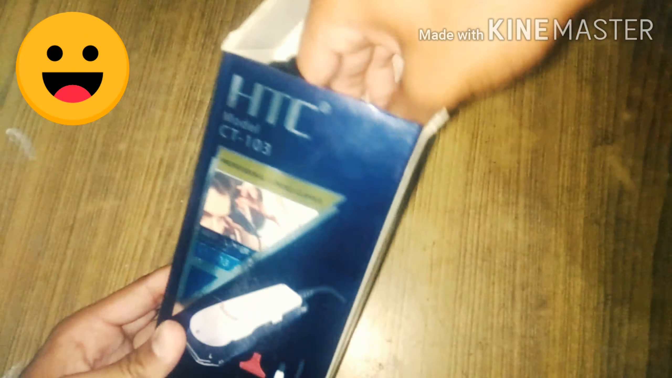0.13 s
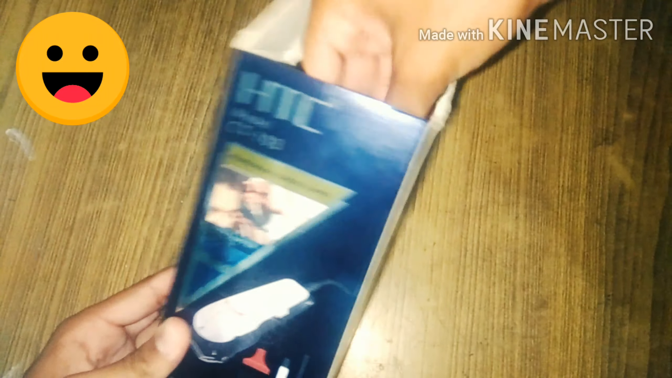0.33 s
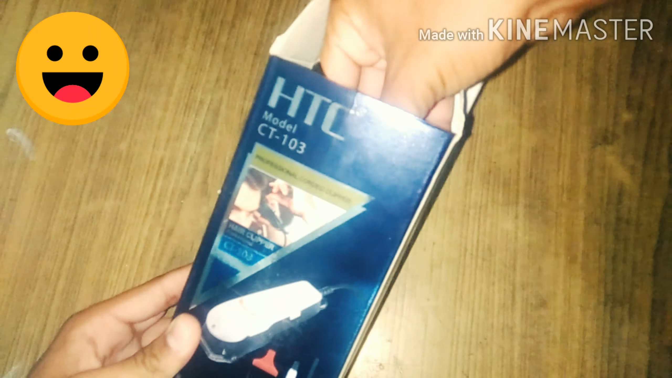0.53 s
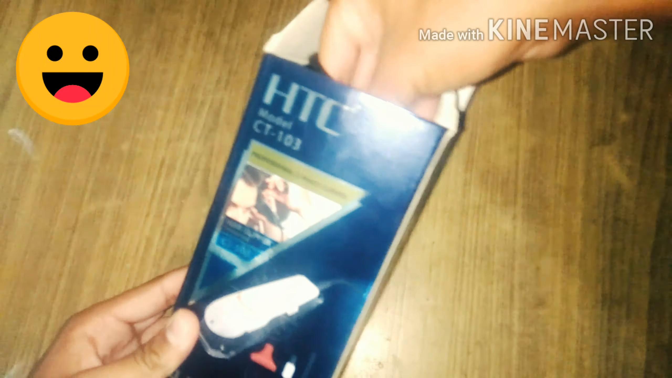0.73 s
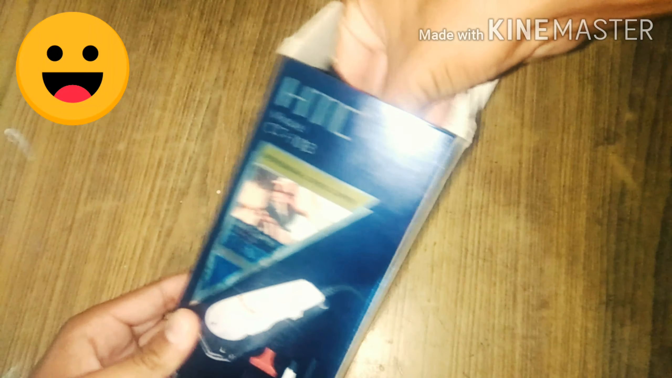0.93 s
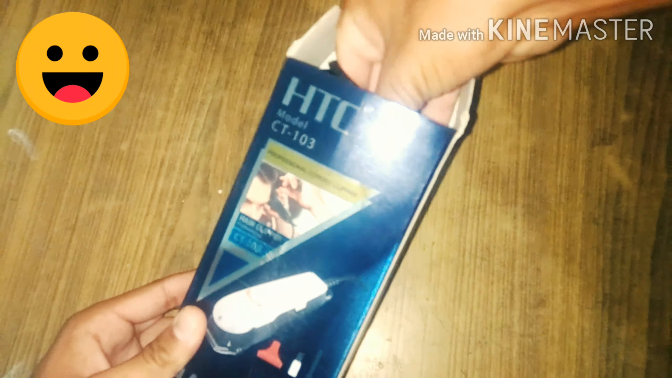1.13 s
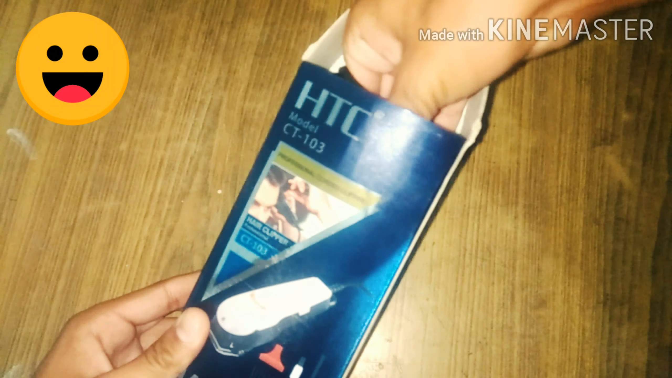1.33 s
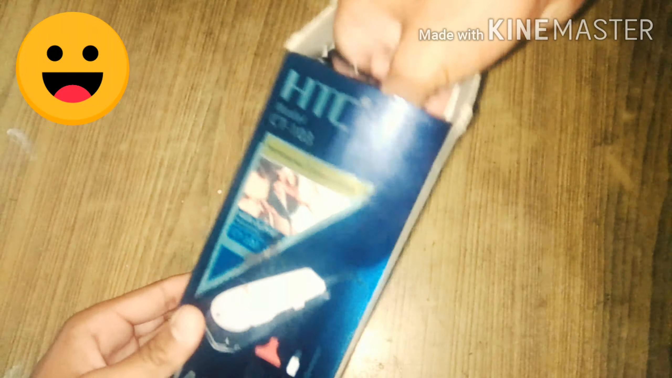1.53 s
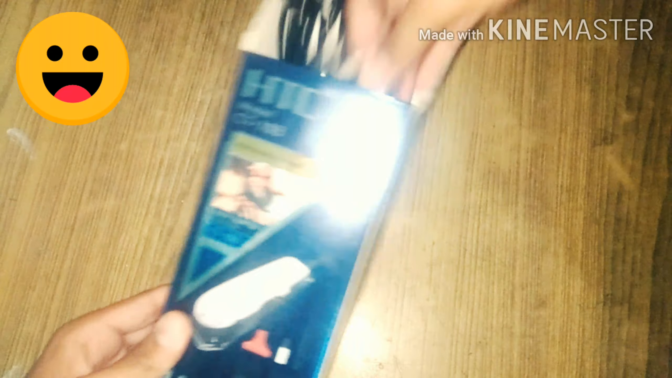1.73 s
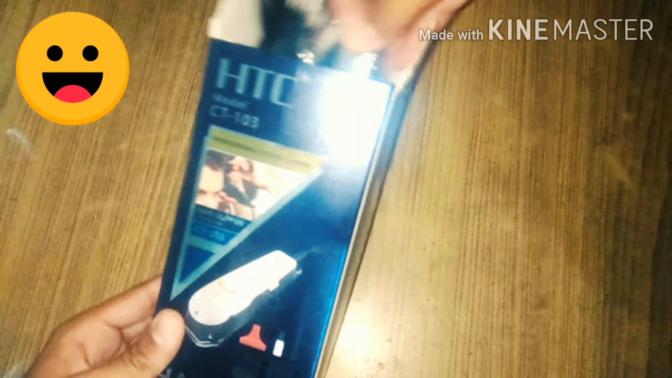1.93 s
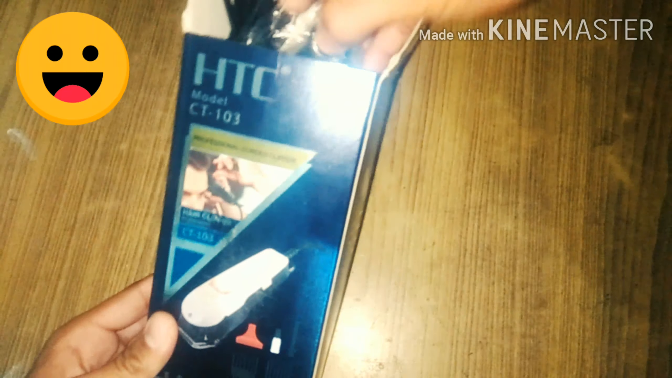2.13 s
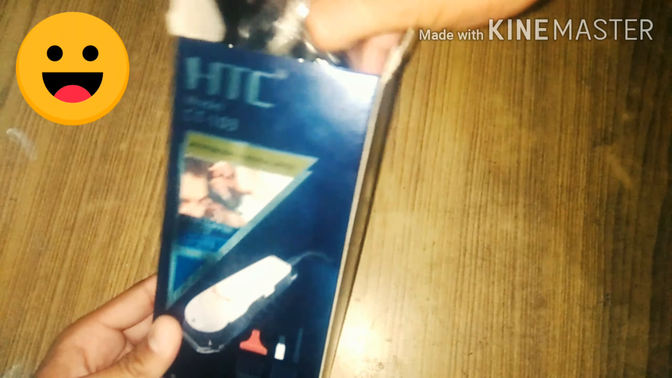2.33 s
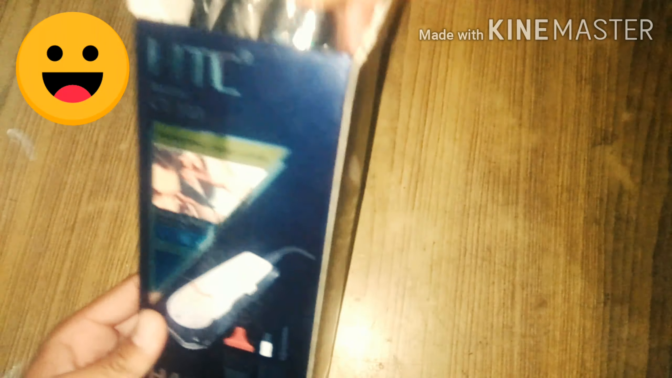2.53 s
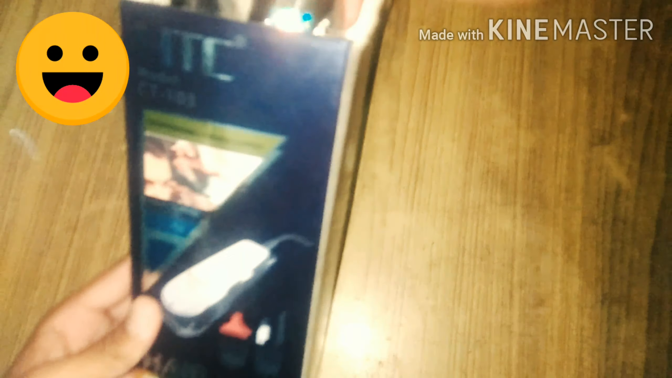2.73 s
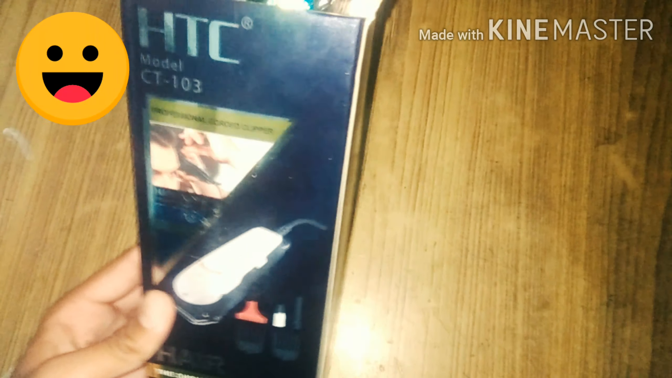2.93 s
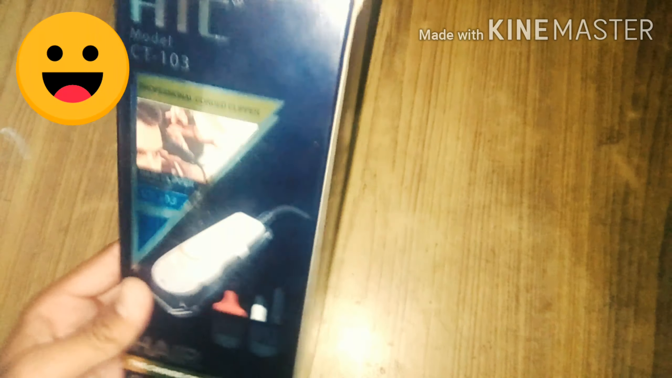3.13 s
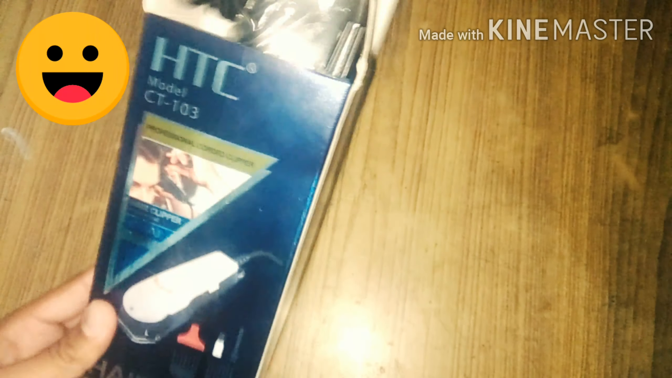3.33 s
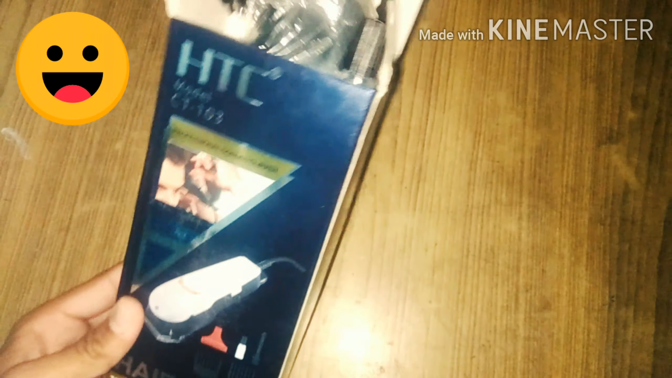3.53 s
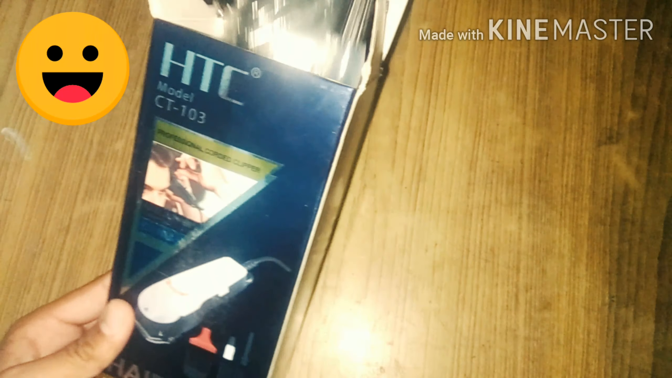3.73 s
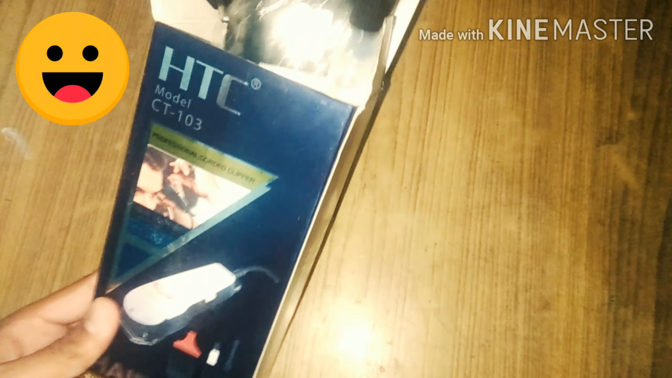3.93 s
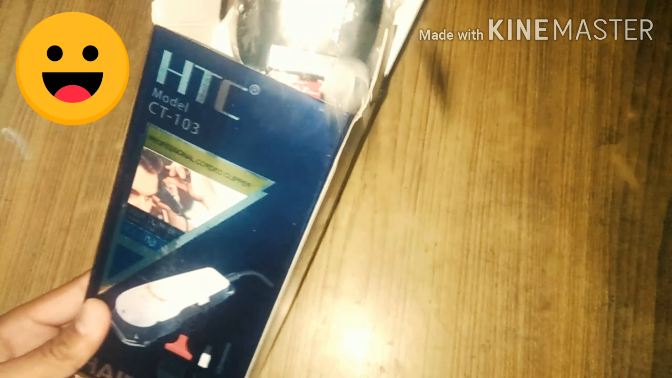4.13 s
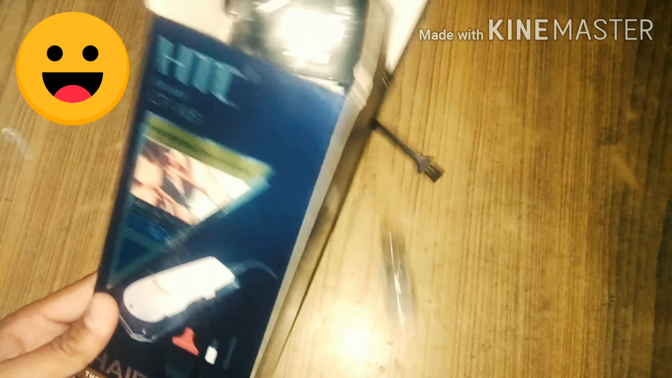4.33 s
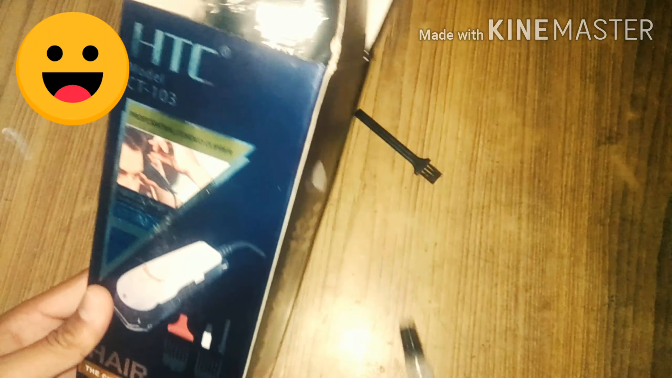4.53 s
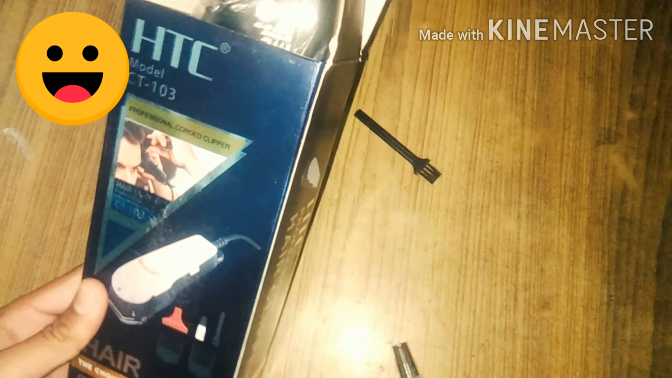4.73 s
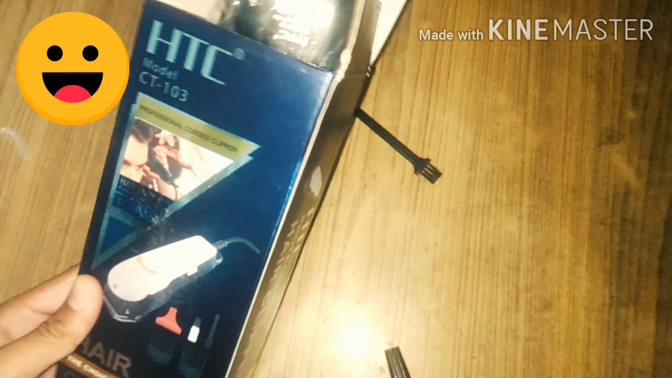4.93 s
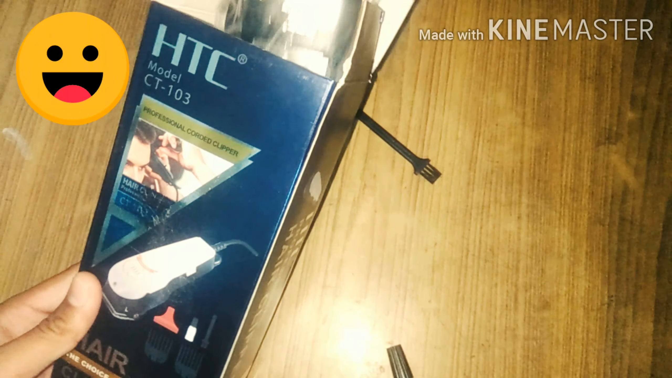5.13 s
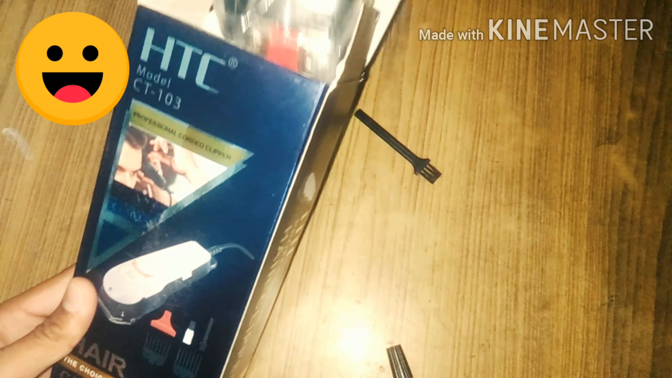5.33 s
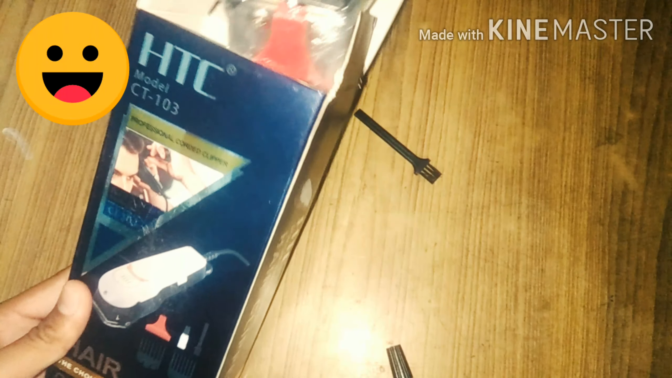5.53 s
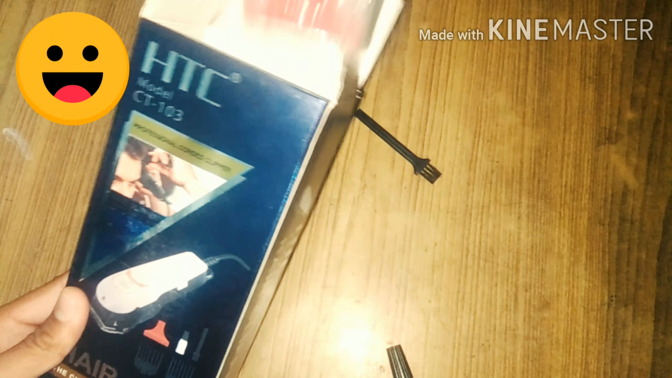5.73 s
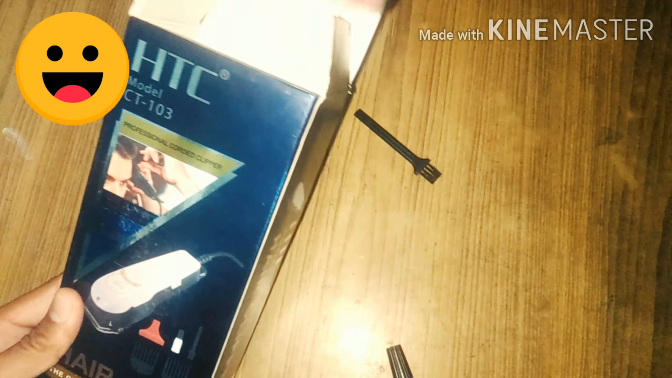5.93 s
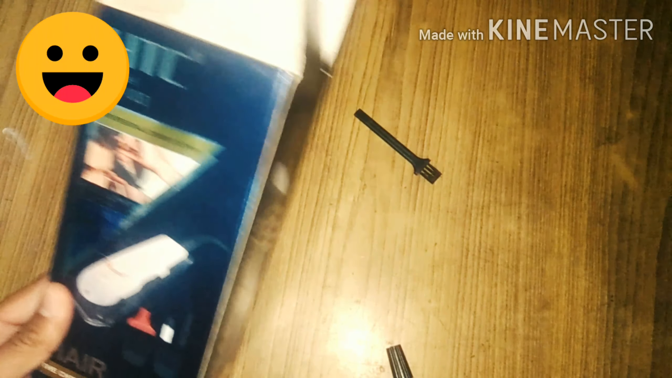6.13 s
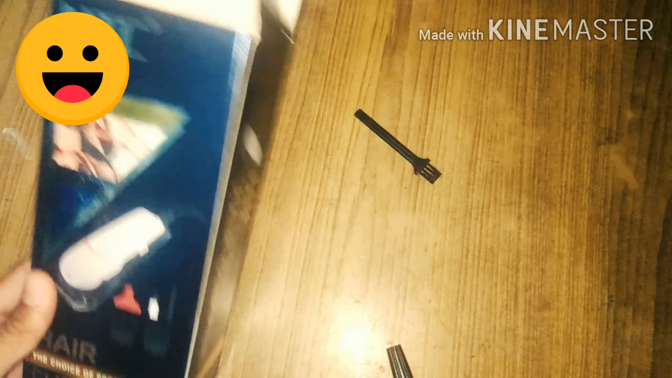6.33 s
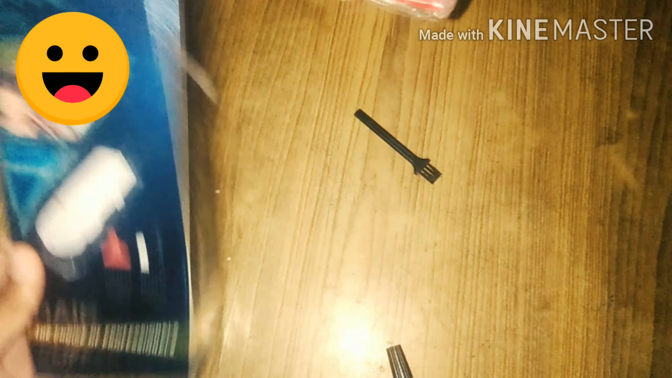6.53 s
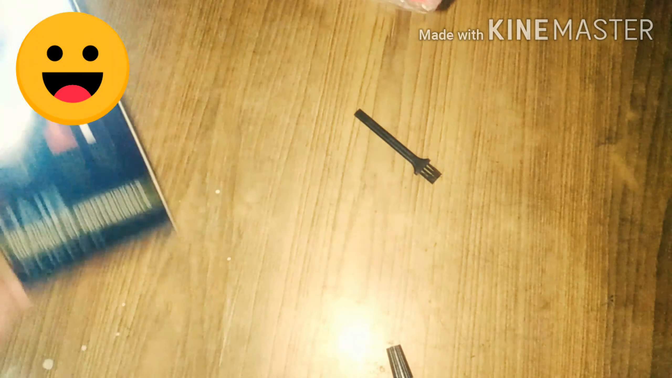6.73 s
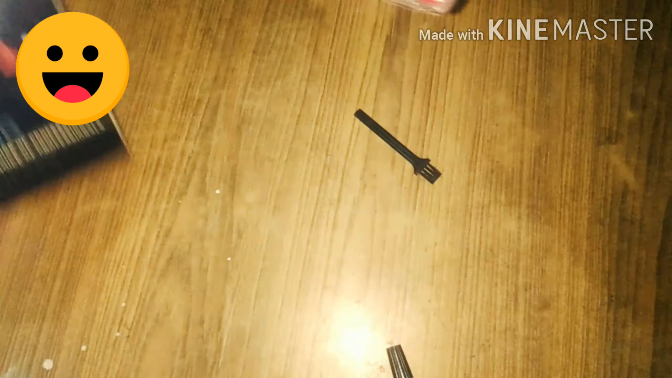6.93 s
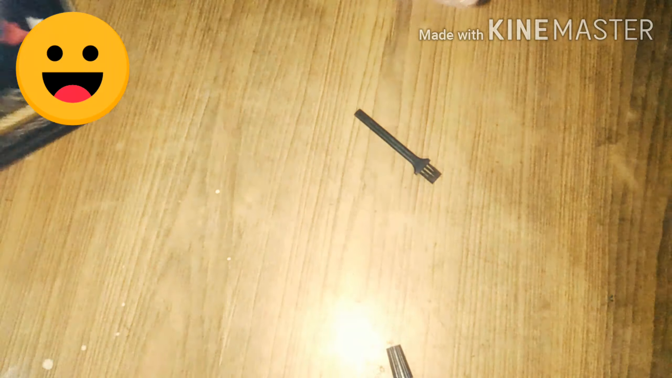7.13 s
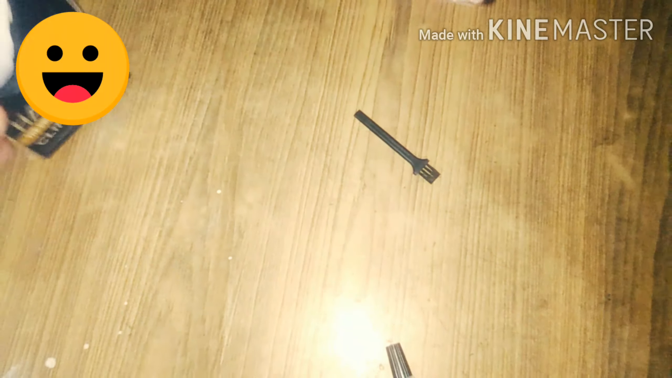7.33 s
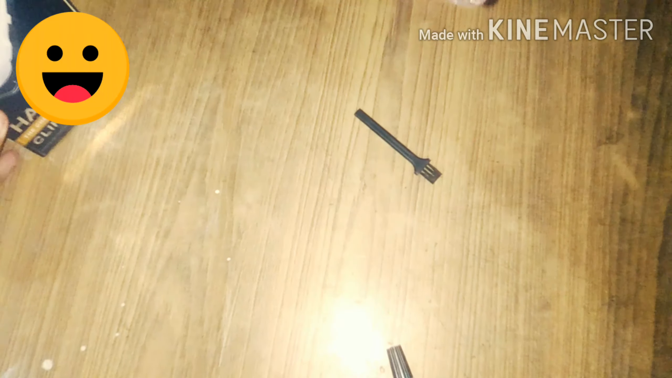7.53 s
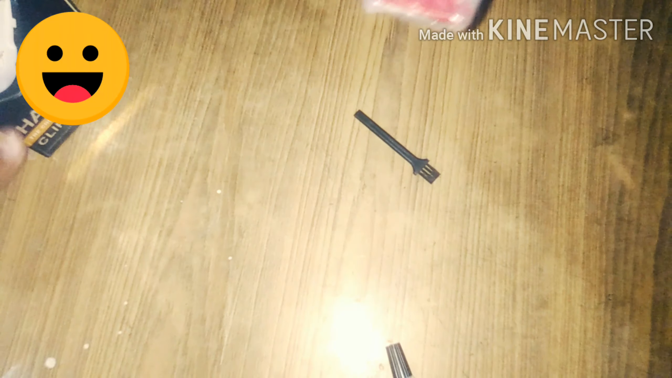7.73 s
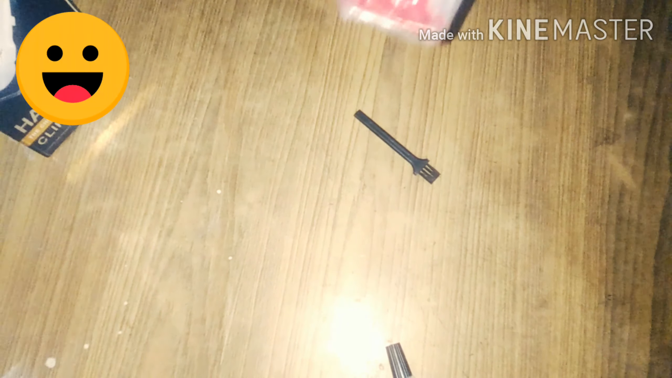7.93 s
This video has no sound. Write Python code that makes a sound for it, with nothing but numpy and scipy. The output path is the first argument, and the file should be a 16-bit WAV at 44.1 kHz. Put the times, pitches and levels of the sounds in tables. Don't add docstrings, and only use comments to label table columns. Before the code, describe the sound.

A hand rustles inside a thin cardboard box, tugging out a crackling plastic tray; small parts clatter onto a wooden table, then the box is set down.

```python
import sys
import numpy as np
from scipy import signal
from scipy.fft import rfft, irfft
from scipy.io import wavfile
from scipy.ndimage import uniform_filter1d

SR = 44100
rng = np.random.default_rng(int(sys.argv[2]) if len(sys.argv) > 2 else 0)


def makeup_ratio(level_db):
    decades = np.asarray(level_db, float) / 20
    return 10 ** decades


def to_wav(sig):
    pcm = np.clip(np.atleast_2d(sig), -1, 1) * 32767
    pcm = np.round(pcm).astype(np.int16)
    wavfile.write(sys.argv[1], SR, pcm.T)


N = 355871

# (peak time [s], rise [s], fall [s], force [dB], hollow over table [dB])
PULLS = [(.12, 0.042, 0.17, -55, 2.5), (1.64, 0.64, 0.3, -59.5, -21), (1.77, 0.17, 0.16, -46, 11),
         (1.85, .14, .025, -46.5, 8), (1.87, 0.16, 0.22, -47, -4.5), (2.0, 0.071, 0.076, -51, 11),
         (2.56, 0.18, 0.29, -55.5, -3), (2.69, 0.089, 0.049, -53.5, -4.5), (2.82, .03, 0.051, -55.5, -2),
         (2.93, 0.13, 0.15, -53.5, -9), (3.21, 0.032, 0.3, -43, 4), (3.32, 0.15, 0.11, -44, 1.5),
         (3.46, 0.075, 0.27, -45, -2), (3.79, 0.12, 0.22, -53.5, 6), (3.9, 0.07, 0.029, -64.5, 16.5),
         (4.0, 0.17, 0.097, -52.5, -2), (4.3, 0.29, 0.049, -52.5, -2), (4.47, 0.14, 0.19, -39, -2),
         (4.6, 0.17, 0.33, -49, -13.5), (4.78, 0.53, 0.13, -49.5, -21), (5.26, 0.062, 0.055, -57, -3),
         (5.42, 0.04, 0.065, -60, -1.5), (5.78, .45, 0.27, -56, -11.5), (6.8, 0.36, 0.94, -69.5, -10.5),
         (7.28, 0.057, 0.19, -55, -11), (7.41, 0.34, 0.66, -54.5, -10.5), (7.72, .3, 0.18, -69.5, -26)]
# (pitch [Hz], level [dB], t60 [s])
TABLE_MODES = [(94, -4, 0.033), (155.6, 1, 0.21), (195, 1.5, 0.11), (245, -0.5, 0.061), (315.3, -3.5, 0.33),
               (396, 1, 0.11), (467.3, -1.5, 0.13)]
# (pitch [Hz], width [Hz], level [dB])
WALLS = [(460.4, 15, -0.5), (535.8, 23, 2), (599, 110, -1), (708.6, 110, -3), (808.3, 38, -3)]
# (pitch [Hz], width [Hz], level [dB])
HOLLOW = [(1028, 240, 1.5), (1150, 220, 2.5), (1305, 310, 2.5), (1620, 300, -13.5)]


def rubbing():
    drag_gain_db = -4.5
    push_db = strokes(PULLS, 0, -5.5)
    drag_db = drag_gain_db + strokes(PULLS, 0.58, -6.5 - drag_gain_db)
    scrape_db = strokes(PULLS, 0.95, -3) + np.array([[-1.5], [1.5]])
    shove = slips(600, 3, 0.8, 2, 0.03)
    scratch = slips(1500, 3.4, 0.55, 2.4, 0.035)
    table = body(shove, [(hz, 7.46 / t60, db) for hz, db, t60 in TABLE_MODES])
    walls, hollow = body(scratch, WALLS), body(scratch, HOLLOW)
    return makeup_ratio(push_db) * table + makeup_ratio(drag_db) * walls + makeup_ratio(scrape_db) * hollow


# (peak time [s], rise [s], fall [s], wide folds [dB], fine creases over them [dB])
CRUMPLES = [(.39, 0.11, 0.074, -57.5, -5), (.82, 0.078, 0.06, -54.5, -1.5), (.97, 0.028, 0.061, -55.5, 0),
            (1.68, 0.042, 0.24, -56.5, -4), (1.77, 0.15, 0.15, -52.5, -7), (1.86, 0.36, 0.037, -48, -11),
            (2.07, 0.43, 0.3, -59, -6), (2.69, 0.36, 0.056, -63.5, -14), (2.81, 0.036, 0.086, -66, -20),
            (2.92, 0.047, 0.13, -57.5, -7.5), (3.21, 0.033, 0.2, -42, -14), (3.27, 0.11, .1, -46.5, -10),
            (3.47, 0.12, 0.072, -55, -2.5), (3.77, 0.14, 1, -60.5, -13.5), (4.07, 0.23, 0.21, -62.5, -4.5),
            (4.24, .06, 0.15, -61.5, 5), (4.385, 0.0056, 0.12, -38, 0), (4.52, 0.13, 0.057, -51.5, -6),
            (4.69, 0.027, 0.34, -69, -3.5), (4.85, .3, 0.16, -72.5, 3.5), (5.3, 0.21, 1, -74.5, -2.5),
            (5.758, 0.08, 0.033, -51, -11.5), (5.79, 0.043, 0.098, -55, -14),
            (7.25, 0.029, 0.13, -63.5, -5), (7.445, 0.078, 0.067, -55.5, -10)]
# (pitch [Hz], level [dB])
FILM = [(1700, -17), (2350, 1), (2800, -5), (3300, -0.5), (4100, -8.5), (5200, 2), (6800, -13), (9200, -9)]


def rustle(count=18, sharpness=6.0, pan_db=6.0):
    wide_db, fine_db = strokes(CRUMPLES, 0, -8.5), strokes(CRUMPLES, 0.91, -12)
    pops = slips(5000, 4.3, 0.4, 3, 0.006)
    popping = rng.integers(0, count, N // 64 + 1).repeat(64)[:N]
    slide = slips(9000, 2, 1, 2.5, 0.015)
    flips = slips(90, 4, 0, 0)
    film = []
    for k, hz in enumerate(np.geomspace(FILM[0][0], FILM[-1][0], count)):
        own_slide = np.roll(slide, 997 * k, axis=1)
        force = evened(pops * (popping == k)) + makeup_ratio(-1.5) * flips + makeup_ratio(-1) * own_slide
        film.append(makeup_ratio(read(FILM, hz)) * body(force, [(hz, hz / sharpness, 0)]))
    wide, fine = evened(sum(film[:count // 2])), evened(sum(film[count // 2:]))
    folds = makeup_ratio(wide_db) * wide + makeup_ratio(fine_db) * fine
    return makeup_ratio(np.array([[pan_db], [-pan_db]]) / 2) * folds


# (time [s], peak [dB], low ring [Hz], high ring over the low one [dB])
CARD = [(0.121, -53.5, 1440, -33), (0.127, -64, 980, -28), (0.142, -32.5, 980, -8.5),
        (0.496, -35, 1060, -24), (0.652, -52.5, 1300, -14), (0.74, -54.5, 990, 0.5),
        (0.977, -45.5, 505, -21), (0.983, -47, 1010, -19), (0.989, -43, 970, -20), (1.09, -59, 1270, -17),
        (1.192, -55, 1270, -21), (1.338, -37, 1050, -13.5), (1.446, -49.5, 1030, 1), (1.607, -35, 555, -39),
        (1.745, -35.5, 1180, -15.5), (1.9, -31, 1060, -24), (1.916, -57, 1200, -13), (1.988, -37, 1240, -8),
        (1.889, -31.5, 1100, -18), (2.109, -40, 1300, -30), (2.205, -51, 490, -30), (2.376, -50, 1180, -18),
        (2.533, -36, 570, -18), (2.536, -49, 1150, -13), (2.765, -63, 1310, -15), (2.88, -51, 1230, -17),
        (2.943, -49, 500, -27), (3.146, -44, 1180, -43), (3.189, -36.5, 1530, -11), (3.312, -36, 1060, 5.5),
        (3.339, -33, 646, -3), (3.512, -37.5, 1240, -13), (3.759, -41, 1270, -7), (3.834, -44.5, 550, -18),
        (3.999, -42.5, 590, -11), (4.089, -28, 840, -5), (4.447, -17, 713, -14.5), (4.465, -35, 550, -11),
        (4.912, -55, 1460, -29), (4.936, -41.5, 890, -8.5), (5.298, -39.5, 1150, -6.5),
        (5.476, -53, 1390, -15.5), (5.582, -31.5, 1146, -3.5), (5.739, -23, 962, 2.5),
        (5.775, -24.5, 995, 4), (7.232, -39, 1220, -5.5), (7.398, -56, 1300, -10), (7.458, -39, 590, -24.5),
        (7.674, -47.5, 630, -6.5)]
# (time [s], peak [dB], low ring [Hz], high ring over the low one [dB], left-right [dB])
TRAY = [(0.064, -48, 1270, 1, 2), (0.633, -37, 1280, -15, -2), (1.176, -46.5, 1060, -11.5, -2),
        (1.393, -49.5, 830, -4, 2.5), (1.821, -24.5, 1100, -22, 1), (1.973, -36.5, 1270, -5, 0.5),
        (2.914, -45, 1130, 2.5, 0.5), (3.904, -40.5, 1230, -18, 5), (4.378, -33.5, 526, -4, 0),
        (4.487, -25, 977, -5, -1.5), (4.551, -34.5, 814, -11, -1.5), (4.573, -36.5, 586, -13, 4.5),
        (4.669, -37.5, 671, -33, 0.5), (5.387, -46.5, 582, 2, 1), (6.66, -53, 1700, -32, -1.5),
        (6.995, -55.5, 1750, -16, -1), (7.307, -38.5, 690, -6, 4.5), (7.428, -42.5, 680, -8.5, 17)]
# (pitch [Hz], level [dB], t60 [s])
PANEL = [(551.7, 1, 0.051), (780, -4.5, 0.003), (844, -6, 0.099), (903, -6, 0.15), (1130, -7, 0.018),
         (1270, 4, 0.26), (1354, 7, 0.014)]


def snaps(low_t60=0.013, high_t60=0.0087):
    out, t = np.zeros((2, N)), np.arange(int(0.2 * SR)) / SR
    card_hz, tray_hz, card_pan_db = 2369, 3100, 0.5
    held_s = 0.028
    rows = [(*row, card_pan_db, card_hz) for row in CARD] + [(*row, tray_hz) for row in TRAY]
    fade = makeup_ratio(-12 - 60 * t / 0.043) * (1 - np.exp(-t / 0.00026))
    for s, db, low_hz, high_db, pan_db, ring_hz in rows:
        luck, cracks = rng.standard_normal(len(PANEL)), rng.standard_normal(len(t))
        high_hz = ring_hz * (1 + 0.025 * rng.standard_normal())
        low = fade * body(cracks, [(low_hz, 700, 0)])
        low = low - ring(t, low_hz, low_t60, 0.00029)
        low = low - ring(t, low_hz, 0.0019, 0.00016)
        high = makeup_ratio(-1.5) * fade * body(cracks, [(high_hz, 1200, 0), (5600, 3000, -17)])
        high = high + ring(t, high_hz, high_t60, 0.00035)
        high = high + makeup_ratio(-3.5) * ring(t, 1.45 * high_hz, high_t60, 0.00042)
        panel = sum(w * makeup_ratio(d) * ring(t, hz, min(t60, held_s), 0.00084)
                    for w, (hz, d, t60) in zip(luck, PANEL))
        add(out, s + 0.0008, makeup_ratio(db) * (low + makeup_ratio(-16) * panel), pan_db - 2.5)
        add(out, s + 0.00061, makeup_ratio(db + high_db) * high, pan_db + 1.0)
    return out


# (time [s], peak [dB],
# pitch of the mode struck most [Hz], t60 [s])
THUMPS = [(0.06, -41, 180, 0.057), (0.143, -38, 151, 0.12), (0.494, -37.5, 202, 0.021),
          (0.537, -43.5, 95, 0.18), (1.047, -41, 92, 0.13), (1.886, -27, 196, 0.04),
          (2.107, -37.5, 460, 0.013), (3.282, -31, 247, 0.071), (3.338, -32, 200, 0.14),
          (3.454, -41.5, 245, 0.16), (4.095, -30, 197, 0.049),
          (4.236, -22, 335, 0.064), (4.286, -29.5, 255, 0.048), (4.376, -30, 350, 0.088),
         (4.447, -11, 365, 0.026), (4.48, -25, 328, 0.091), (4.575, -28.5, 317.2, 0.28),
         (4.668, -29.5, 318, 0.26), (5.385, -40.5, 209, 0.098), (5.584, -34.5, 198, 0.07),
         (5.74, -28.5, 195, 0.092), (5.777, -36, 199.8, 0.28), (6.734, -47.5, 191, 0.067),
         (7.234, -20.5, 147, 0.077), (7.43, -29, 141, 0.18), (7.458, -32, 143, 0.26),
         (7.67, -41.5, 116.4, 0.072)]


def thumps(reach=0.99, modes_db=-9):
    out, t = np.zeros((2, N)), np.arange(int(0.5 * SR)) / SR
    for s, db, hz, t60 in THUMPS:
        near = 0
        for mode_hz, mode_db, mode_t60 in TABLE_MODES:
            luck = rng.uniform(-1, 1)
            weight = np.sign(luck) * (0.5 + abs(luck) / 2)
            weight = weight * np.exp(-(np.log(mode_hz / hz) / reach) ** 2)
            near = near + weight * makeup_ratio(mode_db) * ring(t, mode_hz, mode_t60, 0.00044)
        wall = ring(t, hz, max(t60, 0.02), 0.00081)
        add(out, s, makeup_ratio(db) * (wall + makeup_ratio(modes_db) * near), -0.5)
    return out


# (time [s], peak
# [dB], middle ring over the top one [dB], low ring over the top one [dB])
TICKS = [(0.327, -53, 1, 4), (0.3495, -54, -8, 11), (0.369, -38, -9.5, -1.5), (0.3858, -40, -12, -1),
         (0.41, -56, 7, 9), (0.4998, -60, 4, -17), (0.532, -54, -8, -14), (0.563, -48.5, -13, -6),
         (0.6175, -60, 1, -16), (0.6518, -58, 8, -14), (0.6993, -59, -16, -12), (0.8095, -41, -4, -6),
         (0.831, -53.5, 8, 8), (0.8658, -46, 2, -3), (0.9424, -53.5, -19, -22), (0.965, -42.5, -1, -1),
         (1.1189, -61, -4, -14), (1.428, -60, 7, -3), (1.4459, -57, -2, -16), (1.5932, -61, 4.5, -9),
         (1.6146, -46.5, -9, -17), (1.6552, -47, 1, -7), (1.664, -51, -8, -10), (1.735, -54, 6, -14),
         (1.7898, -48, 0, -6), (1.832, -47, 8, -8.5), (1.864, -63, 4, -12), (1.888, -70, 24, -14),
         (1.925, -52, 2, -10), (1.944, -56, -10, -5), (1.9568, -55, 5, -13), (2.0204, -64, 13, -10),
         (2.054, -54, 9, -8), (2.0652, -46.5, -11, -10), (2.154, -48.5, -4, -12), (2.167, -46, -2.5, -12),
         (2.1862, -49, 9, 8), (2.2091, -37, -16, -11), (2.2662, -52.5, -7, -12), (2.3063, -55.5, 4.5, 13),
         (2.365, -60.5, -10, -6), (2.3976, -56, -12, -12), (2.4668, -62, 7, -8),
         (2.596, -61, -12, -10), (2.683, -59, -9, -9), (2.701, -54.5, -11, -9), (2.812, -64, 5, -10),
             (2.897, -58.5, 9, 2), (2.9143, -44, -10, -4), (2.959, -64, -12, -12), (2.9877, -57, 0, -6),
             (3.106, -61, 0, -7), (3.213, -61, 5, -10), (3.2827, -56.5, 11, -9), (3.3124, -64, 3, -10),
             (3.3507, -53, 8, -5), (3.4174, -62, 2, -12), (3.4483, -49, -10, -12), (3.494, -49, -4, -9),
             (3.61, -51.5, -4.5, -4), (3.669, -67, 7.5, -35), (3.6995, -56.5, -1, -18),
             (3.7594, -49.5, -1, -2), (3.838, -56, 2, -13), (3.8632, -56, 1, -7), (3.898, -53, 3, -5),
             (3.938, -46, -8, -12), (3.9932, -48, 5, 2), (4.02, -49.5, -1, -15), (4.0431, -48.5, -4, -16),
             (4.0687, -51.5, 4, 14), (4.0909, -36.5, -5, -3), (4.156, -43.5, -12, -23),
             (4.1974, -55.5, -11, -18), (4.2189, -41.5, -6, -12), (4.2364, -39.5, -5, -2),
             (4.293, -43.5, 3, -13), (4.348, -50.5, -1, -15),
         (4.377, -30.5, -1.5, -2.5), (4.3894, -27, -10.5, -6), (4.3954, -46, -12.5, -10),
               (4.433, -35, 0.5, -14), (4.4846, -29, -10, -18), (4.547, -48, 3, -15),
               (4.6814, -47.5, 6, -8), (4.7034, -57, 6.5, -12.5), (4.744, -62.5, 2, -11.5),
               (4.775, -44.5, 0.5, -5), (4.804, -60, -11, -13.5), (4.8214, -52, -5, -6),
               (4.8369, -43, -17, -8), (4.9908, -67.5, 6, -6), (5.362, -53, -3, -13),
               (5.3885, -47.5, -23, -7), (5.4187, -50, -0.5, -12), (5.4507, -60, 1, -18),
               (5.5039, -66.5, 2, -5.5), (5.537, -61, 3, -6), (5.684, -66.5, -7, -7.5),
               (5.7578, -47.5, 17, -11), (5.7983, -54.5, 14, -17.5), (5.9293, -57, -4, 1),
               (6.662, -63.5, -16, -23), (6.795, -63.5, -17, -5), (7.0672, -60, -12.5, -4),
               (7.5157, -60.5, 1, 13), (7.549, -76, 21.5, -20), (7.677, -53.5, 3.5, -15)]
# (pitch [Hz], width [Hz], left-right [dB])
CREASE = [(5400, 2100, 9.5), (3100, 1400, 5), (1100, 700, -3.5)]


def ticks(t60=0.014, rise=0.00016, middle_db=5, pan_spread_db=2):
    out, t = np.zeros((2, N)), np.arange(int(0.03 * SR)) / SR
    rows = TICKS
    chance = rng.standard_normal((len(rows), len(t)))
    burst = chance * makeup_ratio(-60 * t / t60) * (1 - np.exp(-t / rise))
    rings = [body(burst, [(hz, width, 0)]) for hz, width, _ in CREASE]
    rings[0] = rings[0] + makeup_ratio(-7) * body(burst, [(8800, 2000, 0)])
    for k, (s, db, mid_db, low_db) in enumerate(rows):
        spread_db = pan_spread_db * chance[k, -1]
        for sound, over_db, (_, _, pan_db) in zip(rings, (0, mid_db + middle_db, low_db), CREASE):
            add(out, s, makeup_ratio(db + over_db) * sound[k] / abs(sound[k]).max(), pan_db + spread_db)
    return out


# (peak time [s], rise [s], fall [s], level [dB], pitch [Hz])
SLIDES = [
    (2.24, 0.1, 0.24, -60, 1480),
    (2.39, 0.13, 0.13, -61, 1454),
    (3.87, 0.16, 0.66, -55.5, 549),
    (7.03, .04, 0.12, -73, 1724),
    (7.09, 0.16, 0.1, -72.5, 1644),
    (2.33, 0.17, .15, -63, 1700),
    (7.5, 0.32, 0.25, -56.5, 687),
    (7.6, 0.17, 0.12, -63.5, 950),
    (7.93, 0.15, 0.2, -68.5, 1435),
    (7.999, 0.15, .3, -69.5, 850),
]


def slides(width_hz=150, sag_per_s=0.04, wobble=0.015, overtone_db=-22):
    out, force, t = np.zeros((2, N)), slips(3300, 2, 1.2, 1), np.arange(N) / SR
    slow = uniform_filter1d(uniform_filter1d(rng.standard_normal(N), size=1500), size=1500)
    wander = wobble * evened(slow)
    low = signal.butter(1, width_hz / 2, fs=SR)
    for s, rise, fall, db, hz in SLIDES:
        near = slice(max(int((s - 2 * rise) * SR), 0), int((s + 2 * fall) * SR))
        pitch = hz * (1 - sag_per_s * (t[near] - s) + wander[near])
        turn = np.exp(2j * np.pi * np.cumsum(pitch) / SR)
        sung = 0
        for k in range(3):
            tone = turn ** (k + 1)
            band = signal.lfilter(*low, signal.lfilter(*low, force[:, near] / tone))
            sung = sung + makeup_ratio(overtone_db * k) * (tone * band).real
        away = np.maximum((s - t[near]) / rise, (t[near] - s) / fall)
        out[:, near] += evened(sung) * makeup_ratio(db - 20 * away ** 2)
    return out


# (frequency [Hz], t60 [s])
ROOM = [(120, 0.37), (500, 0.37), (2000, 0.22), (6000, 0.014)]


def room(x):
    length = SR // 2
    taps = np.zeros((2, length))
    at = np.arange(120, length - 20, 20)
    signs = rng.choice([-1., 1.], (2, len(at)))
    np.put_along_axis(taps, at + rng.integers(0, 20, (2, len(at))), signs, 1)
    echoes = alike(np.pad(taps, ((0, 0), (0, N - length))))[:, :length]
    hz, t, z = signal.stft(echoes, SR, nperseg=256)
    tail = signal.istft(z * makeup_ratio(-60 * t / read(ROOM, hz)[:, None]), SR, nperseg=256)[1]
    return signal.fftconvolve(x.mean(0)[None], tail / np.linalg.norm(tail[0]), axes=1)[:, :N]


# (frequency [Hz], density [dB per Hz])
HUSH = [(30, -36), (112, 2.5), (392, -15), (760, -22), (2190, -32), (7130, -34), (7700, -42), (9270, -42.5)]


def hush(level_db=-71):
    frames, hz = N // 256 + 5, np.fft.rfftfreq(1024, 1 / SR)
    a, b, c, d, patches = rng.standard_normal((frames, 513, 5)).T
    patches = evened(uniform_filter1d(uniform_filter1d(patches, 9, 0), 14, 1))
    colour_db = np.maximum(read(HUSH, hz), -53)[:, None]
    z = np.array([a + 1j * b, c + 1j * d]) * makeup_ratio(colour_db + 0.5 * patches)
    noise = signal.istft(z, nperseg=1024, noverlap=768)[1][:, :N]
    return makeup_ratio(level_db) * evened(alike(noise))


# (time [s], pressure [dB])
GRIP = [(0, -67), (.25, -63), (1.0, -62), (1.5, -68.5), (2.25, -63), (2.75, -68), (3.13, -71.5), (3.6, -70),
        (3.95, -54.5), (4.3, -78.5), (4.65, -81.5), (5.1, -75), (5.4, -63.5), (5.7, -65.5), (6.0, -89),
        (6.3, -91.5), (7.2, -74), (8.07, -74)]


def strokes(rows, share, rest_db):
    t = np.arange(0, N + 64, 64) / SR
    power = makeup_ratio(2 * (np.interp(t, *np.transpose(GRIP)) + rest_db))
    for s, rise, fall, db, tilt_db in rows:
        away = np.maximum((s - t) / max(rise, 0.001), (t - s) / max(fall, 0.001))
        power = power + makeup_ratio(2 * (db + share * tilt_db - 20 * away))
    return np.interp(np.arange(N) / SR, t, 10 * np.log10(power))


def slips(per_s, spread_db, smooth, clump_db, clump_s=0.012):
    clicks = rng.choice([-1, 1], (2, N)) * (rng.random((2, N)) < per_s / SR)
    clicks = clicks * makeup_ratio(spread_db * np.minimum(rng.exponential(1, (2, N)), 4))
    clumps = evened(uniform_filter1d(rng.standard_normal(N), int(clump_s * SR)))
    friction = smooth * rng.standard_normal((2, N))
    return alike(evened(clicks) + friction) * makeup_ratio(clump_db * clumps)


def body(force, modes):
    return evened(sum(makeup_ratio(db) * resonate(resonate(force, hz, w), hz, w) for hz, w, db in modes))


def resonate(x, hz, width):
    return signal.lfilter(*signal.iirpeak(hz, hz / width, SR), x)


def ring(t, hz, t60, rise):
    return np.sin(2 * np.pi * hz * t) * makeup_ratio(-60 * t / t60) * (1 - np.exp(-t / rise))


def evened(x):
    return x / np.sqrt(np.mean(x ** 2) + 1e-20)


def read(points, hz):
    f, value = np.transpose(points)
    return np.interp(np.log(hz + 1), np.log(f + 1), value)


def add(mix, s, sound, pan_db, lag_per_db=1.27):
    for channel, side in enumerate((1, -1)):
        start = max(round(s * SR - side * pan_db * lag_per_db), 0)
        part = mix[channel, start:][:len(sound)]
        part += makeup_ratio(side * pan_db / 2) * sound[:len(part)]


# (frequency [Hz], left-right likeness [0 to 1])
SAME = [(60, 0.92), (200, 0.97), (500, 0.75), (1500, 0.57), (5000, 0.42), (10000, .05)]


def alike(pair):
    a, b = rfft(pair)
    same = np.clip(read(SAME, np.fft.rfftfreq(N, 1 / SR)), 0, 1)
    return irfft([a, same * a + np.sqrt(1 - same ** 2) * b], N)


def smear(x, level_db=-17, t60=0.018):
    t = np.arange(800) / SR
    lead = rng.standard_normal(len(t)) * makeup_ratio(-60 * t / t60)
    lead = lead - uniform_filter1d(lead, size=40)
    lead = lead[None, ::-1] / np.linalg.norm(lead)
    return x[:, :N] + makeup_ratio(level_db) * signal.oaconvolve(x, lead)[:, len(t):][:, :N]


def scene():
    hits = makeup_ratio(-1.5) * thumps() + makeup_ratio(8.0) * snaps() + makeup_ratio(0.5) * ticks()
    rub = rubbing() + rustle() + slides()
    return hits + rub + room(makeup_ratio(-14.5) * hits + makeup_ratio(-24.0) * rub)


def roll_off(x):
    return signal.sosfilt(signal.butter(12, 15500, fs=SR, output="sos"), x)


# (frequency [Hz], gain [dB])
EDGE = [(30, -23.5), (110, -0.5), (7300, -1), (7600, -19.5), (8200, -32.5), (8900, -9.5), (10000, -28.5),
        (13000, -43.5)]


def record(dry):
    gain = makeup_ratio(read(EDGE, np.fft.rfftfreq(4096, 1 / SR)))
    colour = signal.minimum_phase(np.roll(irfft(gain ** 2), 2048)[1:], n_fft=2 ** 16)
    smeared = smear(np.pad(dry, ((0, 0), (0, 1))))
    heard = signal.oaconvolve(smeared, colour[None])[:, :N] + hush()
    return roll_off(heard)


dry = scene()
out = record(dry)
to_wav(out)
```